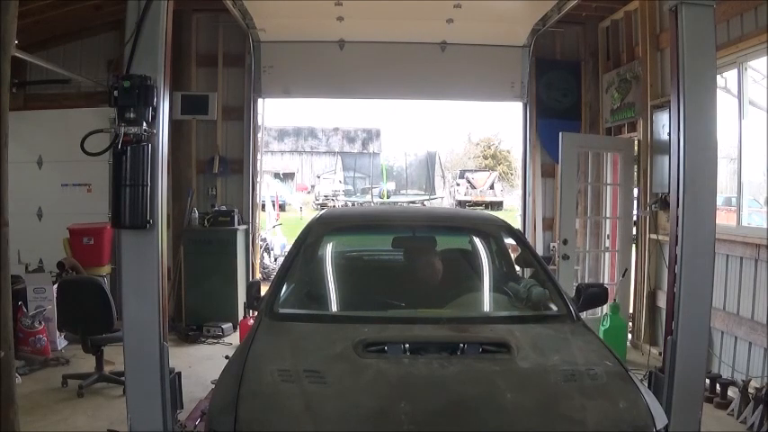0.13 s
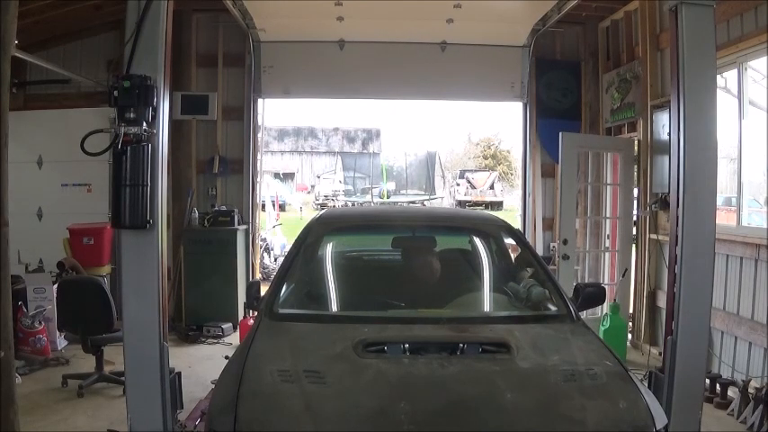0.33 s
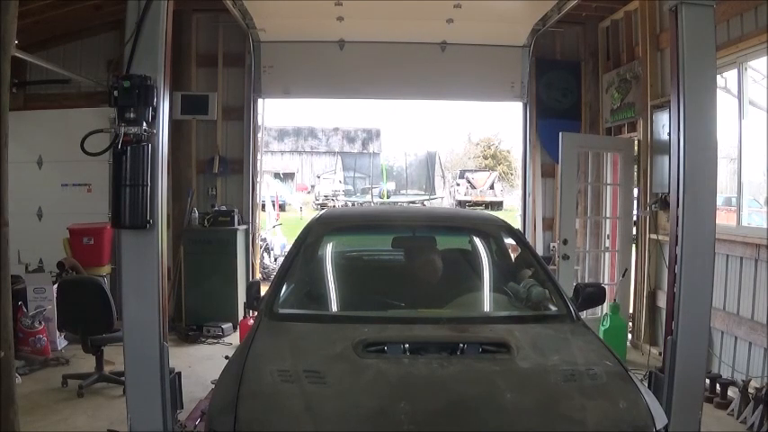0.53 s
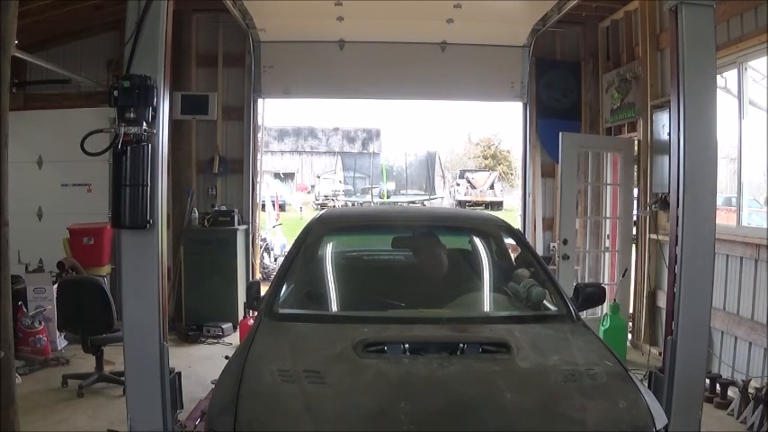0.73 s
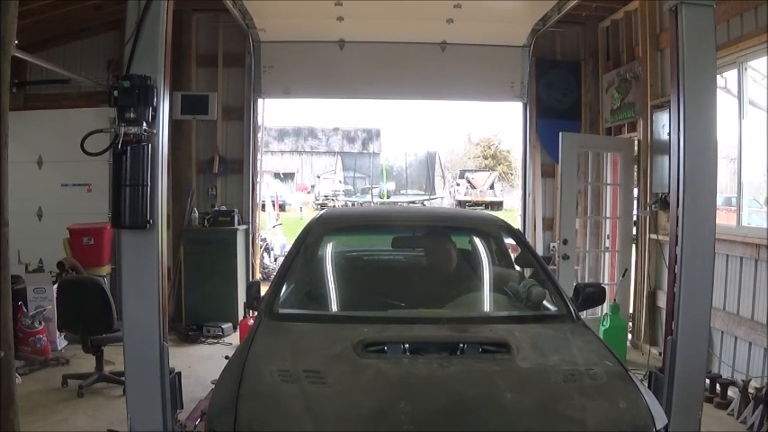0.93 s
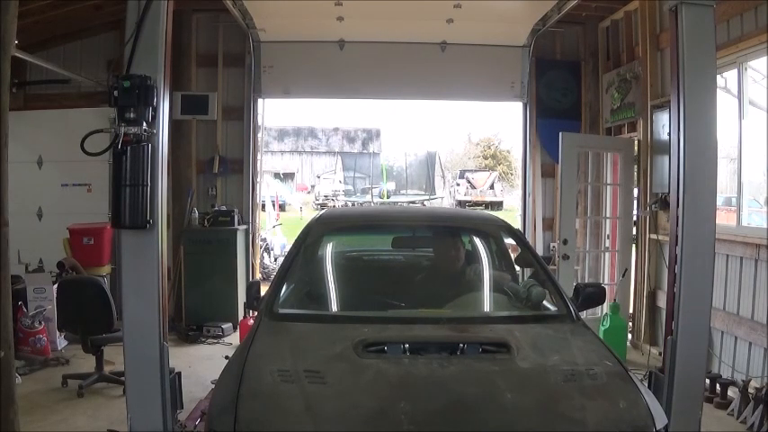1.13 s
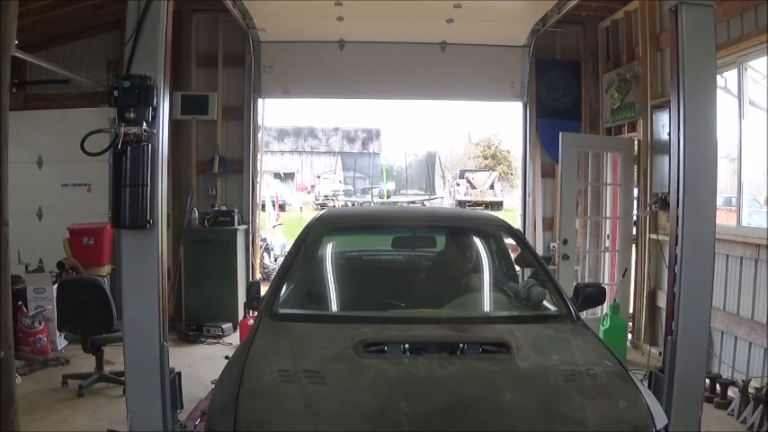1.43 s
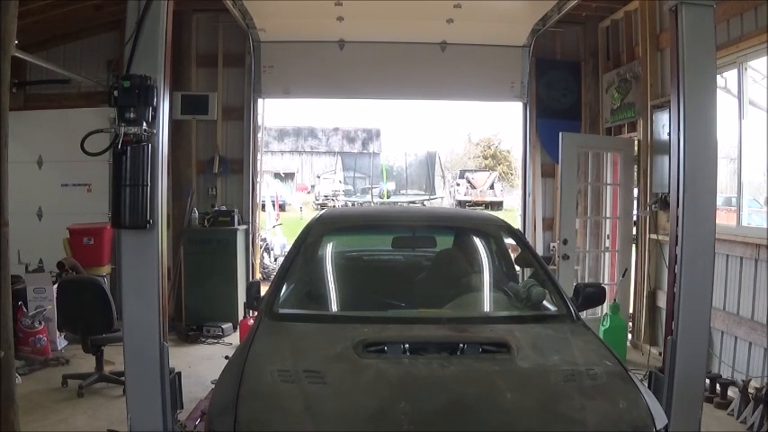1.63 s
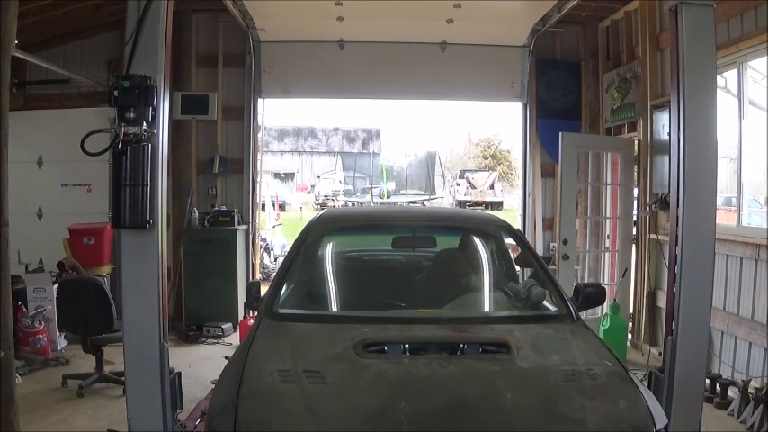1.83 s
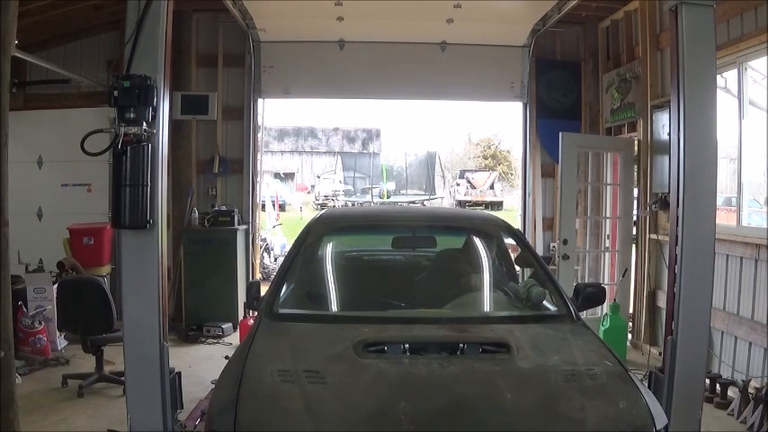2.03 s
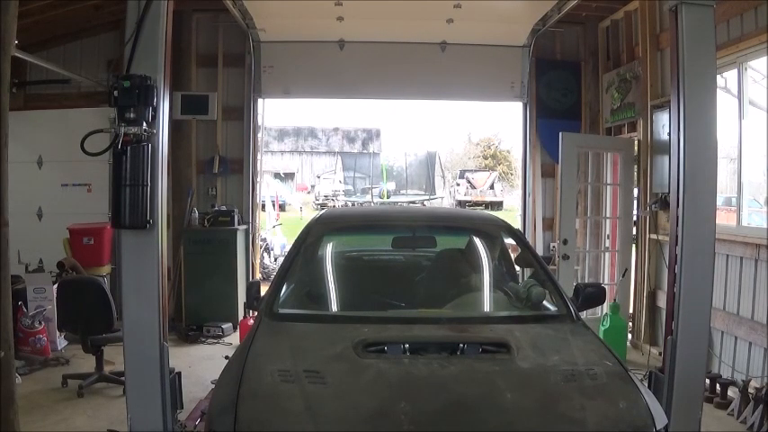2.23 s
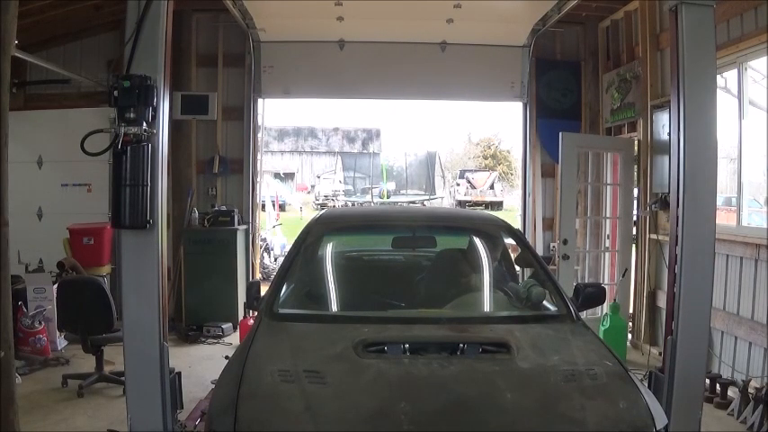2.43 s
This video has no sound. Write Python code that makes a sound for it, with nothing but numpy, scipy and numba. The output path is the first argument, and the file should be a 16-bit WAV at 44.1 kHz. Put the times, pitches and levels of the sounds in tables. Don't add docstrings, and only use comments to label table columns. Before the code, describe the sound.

A car door slams shut with a heavy, rattling thud in a garage, then faint creaks and knocks

```python
import sys
import numpy as np
from scipy import signal
from scipy.fft import rfft, irfft
from scipy.io import wavfile
from scipy.ndimage import uniform_filter1d
from numba import njit

SR = 44100
rng = np.random.default_rng(int(sys.argv[2]) if len(sys.argv) > 2 else 0)


def attenuation_scalar(level_db):
    decades = np.asarray(level_db, float) / 20
    return 10 ** decades


def log_audio(samples):
    frames = np.atleast_2d(samples).T
    limited = np.clip(frames, -1, 1)
    pcm = np.round(limited * 32767).astype(np.int16)
    wavfile.write(sys.argv[1], SR, pcm)


N = 114660
T = np.arange(N) / SR


def unit(x):
    return x / np.sqrt(np.mean(x ** 2))


def conv(a, b):
    return signal.fftconvolve(a, b)[:N]


def curve(table, hz):
    table = np.array(table, float)
    return np.interp(np.log(np.maximum(hz, 1)), np.log(table[:, 0]), table[:, 1])


def noise():
    return rng.standard_normal(N)


def colour(x, table):
    gain = attenuation_scalar(curve(table, np.fft.rfftfreq(N, 1 / SR)))
    return unit(irfft(rfft(x) * gain, N))


def band(x, hz, width):
    return signal.lfilter(*signal.iirpeak(hz, hz / min(width, .4 * SR), SR), x)


def noise_band(hz, width):
    return band(band(noise(), hz, width), hz, width)


def high(x, hz):
    return signal.sosfilt(signal.butter(2, hz, "high", fs=SR, output="sos"), x)


def fade(start, t60, rise=0.0001):
    age = np.maximum(T - start, 0)
    return (1 - np.exp(-age / rise)) * 10 ** (-3 * age / t60)


def swell(start, hz, db, t60, rise):
    return attenuation_scalar(db) * np.sin(2 * np.pi * hz * (T - start)) * fade(start, t60, rise)


def mode(k, age, hz, db, t60):
    return (-1) ** k * attenuation_scalar(db) * np.sin(2 * np.pi * hz * age) * 10 ** (-3 * age / t60)


def struck(blows, modes):
    out, age = np.zeros(N), T[:SR // 2]
    scatter = np.clip(rng.standard_normal((len(blows), len(modes))), -1, 1)
    for (start, db, contact), row in zip(blows, scatter):
        ring = sum(mode(k, age, hz, g + r, t60) for k, ((hz, g, t60), r) in enumerate(zip(modes, row)))
        push = np.sin(np.pi * np.clip(age[:800] / max(contact, 1e-4), 0, 1))
        first = int(start * SR)
        hit = attenuation_scalar(db) * signal.fftconvolve(ring, push / push.sum())[:N - first]
        out[first:first + len(hit)] += hit
    body_low_hz = 80
    return high(high(out, body_low_hz), body_low_hz)


# frequency in Hz, level in dB per Hz.
ROOM_TONE = [(15, -12), (25, -13), (108, -9), (840, -11.5), (911, -13.5), (1610, -15), (1840, -16),
             (2690, -16), (16000, -27)]
# frequency in Hz, level in dB.
ROOM_TONE_SIDE = [(60, -22), (110, -41), (200, -8.5), (380, -3), (700, -2), (1290, 0.5), (2380, -2.5),
                  (4400, -5), (8120, -3.5), (15000, -1)]
# frequency in Hz, level in dB.
HUM = [
    (123.8, -69.5),
    (7870, -75.5),
]
ROOM_TONE_DB = -56.5


def floor():
    mid = colour(noise(), ROOM_TONE)
    side_gain = attenuation_scalar(curve(ROOM_TONE_SIDE, np.fft.rfftfreq(N, 1 / SR)))
    side = irfft(rfft(colour(noise(), ROOM_TONE)) * side_gain, N)
    hum = sum(attenuation_scalar(db) * unit(band(noise(), hz, hz / 150)) for hz, db in HUM)
    return attenuation_scalar(ROOM_TONE_DB) * (mid + side * np.array([[1], [-1]])) + hum


# frequency in Hz, t60 in seconds, side against mid in dB.
GARAGE = [(40.3, 0.23, 2.5), (119, 0.49, -21), (246, 0.5, -11), (513, 0.58, -9), (1000, 0.46, -3.5),
          (2140, 0.5, -8.5), (6000, 0.34, -3.5), (11800, 0.4, -4)]
WET_DB, BUILD_S, WET_LOW_HZ = -0.5, 0.0047, 203


def garage(x):
    table = np.array(GARAGE)
    hz, age, echoes = signal.stft(rng.standard_normal((2, SR)), SR, nperseg=512)
    echoes = echoes * 10 ** (-3 * age / curve(table[:, :2], hz)[:, None])
    echoes[1] *= attenuation_scalar(curve(table[:, ::2], hz))[:, None]
    build = 1 - np.exp(-T[:SR] / BUILD_S)
    mid, side = signal.istft(echoes, SR, nperseg=512)[1][:, :SR] * build
    norm = attenuation_scalar(WET_DB) / np.sqrt(np.sum(mid ** 2))
    sent = 0.055 * x + high(x, WET_LOW_HZ)
    return np.array([conv(sent, (mid + side) * norm), conv(sent, (mid - side) * norm)])


# time in seconds, level in dB.
SWAY = [
    (0, -65),
    (.6, -40),
    (.9, -50),
    (1.3, -54.5),
    (1.7, -56.5),
    (2.0, -65),
    (2.35, -61),
    (2.6, -60),
]
SWAY_HZ, SWAY_WIDTH_HZ = 65, 153


def sway():
    return unit(noise_band(SWAY_HZ, SWAY_WIDTH_HZ)) * attenuation_scalar(np.interp(T, *np.array(SWAY).T))


# start in seconds, frequency in Hz, level in dB, t60 in seconds, rise in seconds.
BOOMS = [
    (.255, 37.8, -8, 0.46, 0.041),
    (0.37, 38, -29, 0.83, 0.043),
    (0.2, 87, -11, 0.87, 0.048),
    (0.27, 300, -17.5, 0.28, 0.037),
    (2.33, 44, -36, 0.53, 0.018),
]


def boom():
    return sum(swell(*row) for row in BOOMS)


# start in seconds, level in dB, contact time in seconds.
KNOCKS = [(.06, -47, 0.003), (.095, -36, 0.0048), (.118, -37, 0.0021), (.15, -42, 0.011),
          (.19, -27, 0.0071), (.868, -53, 0.0054), (1.27, -45.5, 0.0013), (1.655, -36, 0.0039),
          (1.678, -38, 0.0044), (2.2925, -28, 0.0019), (2.3035, -26, 0.0016), (2.316, -38, 0.0025),
          (2.336, -24.5, 0.0021), (2.357, -44, 0.0013), (2.41, -31, 0.0024), (2.422, -45, 0.0042),
          (2.435, -41, 0.0041)]
# frequency in Hz, level in dB, t60 in seconds.
TRIM = [(104, -10, 0.1), (153.6, 1.5, 0.036), (200, 0.5, 0.061), (233, 6, 0.027), (300, -4, 0.065),
        (367, -2, 0.022), (594, -16.5, 0.043), (1023, -9, 0.038)]


def knocks():
    return struck(KNOCKS, TRIM)


# start in seconds, level in dB, centre in Hz, width in Hz, t60 in seconds.
CLICKS = [(0.013, -48, 4080, 200, 0.033), (0.047, -36.5, 2807, 200, 0.018),
          (0.1359, -31, 8500, 6900, 0.018), (0.995, -36.5, 730, 200, 0.028),
          (0.993, -44.5, 3030, 6000, 0.3), (0.994, -42.5, 1260, 1230, 0.11), (1.026, -33, 763, 200, 0.047),
          (1.043, -41.5, 550, 150, 0.045), (1.013, -40, 1170, 500, 0.067), (1.046, -52, 4260, 1500, 0.13),
          (1.012, -50, 4400, 1500, 0.055), (1.101, -50, 3000, 4000, .05), (1.206, -49, 1740, 121, 0.081),
          (1.534, -50.5, 6000, 6000, 0.079), (1.574, -44, 7200, 4200, 0.11), (1.578, -51, 3900, 2030, 0.14),
          (1.677, -31.5, 454, 300, 0.029), (2.127, -50.5, 8480, 4000, 0.039),
          (2.293, -45, 2514, 5040, 0.038), (2.299, -33, 1000, 590, .03), (2.308, -36.5, 1200, 1560, 0.11),
          (2.3068, -46, 6000, 4030, 0.024), (2.316, -44.5, 1680, 1490, 0.054),
          (2.317, -51, 6600, 3000, 0.029), (2.367, -48, 900, 1500, 0.027), (2.342, -46, 880, 1460, 0.14),
          (2.3866, -45.5, 1500, 1780, 0.03), (2.479, -48, 2880, 200, 0.028)]
CLICK_RISE_CYCLES = 2.84


def clicks():
    out = np.zeros(N)
    for start, db, hz, width, t60 in CLICKS:
        out += attenuation_scalar(db) * unit(noise_band(hz, width)) * fade(start, t60, CLICK_RISE_CYCLES / hz)
    return out


# middle in seconds, length in seconds, level in dB, centre in Hz, width in Hz.
SCUFFS = [(0.031, 0.45, -58, 4200, 10000), (0.18, 0.37, -58.5, 840, 1170), (0.651, 0.13, -54, 4200, 7300),
          (1.02, 0.066, -58.5, 10200, 1400), (1.042, 0.094, -51, 1150, 450), (0.77, 0.034, -68, 3450, 2100),
          (0.76, 0.077, -70, 7000, 4400), (1.643, 0.11, -60, 6500, 2300), (1.671, 0.062, -57.5, 1260, 1900),
          (1.5, 0.096, -76, 8600, 230), (1.057, 0.1, -48.5, 375, 350), (1.587, 0.15, -57.5, 820, 6800),
          (2.324, 0.15, -51, 500, 480), (0.13, 0.36, -50, 162, 155)]
SCUFF_GRAIN_DB = 5.5


def scuffs():
    out = np.zeros(N)
    for middle, length, db, hz, width in SCUFFS:
        grain = attenuation_scalar(SCUFF_GRAIN_DB * unit(uniform_filter1d(noise(), size=90)))
        rub = unit(noise_band(hz, width) * grain)
        out += attenuation_scalar(db) * rub * np.exp(-((T - middle) / (length / 2)) ** 2)
    return out


# frequency in Hz, level in dB per Hz.
METAL = [(180, -23), (300, 0), (600, -1.5), (892, -2.5), (1250, -7), (1900, -8), (4200, -15.5),
         (7500, -18.5), (12000, -31.5), (15500, -52.5)]
RATTLE_DB, RATTLE_T60_S, RATTLE_PER_S, RATTLE_SPREAD_DB, RATTLE_DARK_HZ = -1.5, 0.49, 3100, 3.5, 3110


def rattle():
    grains = (rng.random(N) < RATTLE_PER_S / SR) * attenuation_scalar(RATTLE_SPREAD_DB * rng.exponential(size=N))
    chatter = conv(grains, np.exp(-T[:400] / 0.0022))
    chatter = unit(chatter * colour(noise(), METAL))
    chatter = signal.lfilter(*signal.butter(2, RATTLE_DARK_HZ, fs=SR), chatter)
    return attenuation_scalar(RATTLE_DB) * chatter * fade(CRACKS[1][0], RATTLE_T60_S, 0.06)


# start in seconds, level in dB.
CRACKS = [(0.2365, -20.5), (0.2435, -16), (0.252, -9.5), (0.2583, -2), (0.264, -6), (0.277, -9.5),
          (0.297, -5.5), (0.3177, -3), (0.336, -11.5), (.35, -15), (0.362, -15.5), (0.377, -17)]
CRACK_T60_S, CRACK_RISE_S = 0.05, 0.0031


def cracks():
    bursts = sum(attenuation_scalar(db) * fade(start, CRACK_T60_S, CRACK_RISE_S) for start, db in CRACKS)
    return bursts * colour(noise(), METAL)


# start in seconds, frequency in Hz, level in dB, t60 in seconds.
DRUMS = [(0.2357, 179.7, 2, .17), (0.242, 117.9, -6, 0.25), (0.267, 200, -4.5, 0.068), (.286, 175, 4, 0.16),
         (0.315, 200, -1.5, .15), (.351, 189.3, 0.5, 0.17), (0.351, 119.4, -2, 0.15), (.424, 189, -9, 0.13),
         (0.466, 121.4, -13.5, 0.26), (.47, 214, -12.5, .15), (.535, 170.5, -17.5, 0.21)]
DRUM_RISE_S = .009


def drum():
    return sum(swell(*row, DRUM_RISE_S) for row in DRUMS)


# frequency in Hz, level in dB, t60 in seconds.
DOOR = [(108.4, -9, .25), (94.8, -16, 0.26), (137.4, -13.5, 0.21), (147, 0.5, 0.13), (179, -12.5, 0.092),
        (219.5, -9, .12), (253, -5.5, 0.11), (300, -3.5, 0.099), (340.7, -6.5, 0.074), (395.5, -6, 0.068),
        (468, -10.5, 0.079), (550, -10.5, 0.0416), (665, -11.5, 0.052), (774, -11.5, 0.033)]
SHUDDER_DB, SHUDDER_T60_S, SHUDDER_RISE_S, SHUDDER_PER_S, SHUDDER_RING = 4, 0.46, 0.015, 230, 0.34


def shudder():
    slaps = (rng.random(N) < SHUDDER_PER_S / SR) * noise()
    age = T[:SR // 4]
    ring = sum(mode(k, age, hz, db, min(t60, .12) * SHUDDER_RING)
               for k, (hz, db, t60) in enumerate(DOOR[5:]))
    return attenuation_scalar(SHUDDER_DB) * unit(conv(slaps, ring)) * fade(BLOWS[2][0], SHUDDER_T60_S, SHUDDER_RISE_S)


# start in seconds, level in dB, contact time in seconds.
BLOWS = [
    (.2305, -13.5, 0.00057),
    (.2355, -10.5, 0.0016),
    (.2412, 2.5, 0.003),
    (.259, -7.5, 0.0012),
    (.2905, -3.5, 0.0012),
    (.3305, -1, 0.0014),
    (.3605, 0.5, 0.0016),
    (.4055, -8, 0.0021),
    (.476, -14.5, 0.0015),
    (.54, -14.5, 0.0033),
]
DOOR_DB = -8.5


def shell():
    return attenuation_scalar(DOOR_DB) * (struck(BLOWS, DOOR) + shudder())


PAN_DB, BODY_SIDE_DB, BODY_LAG_S = -7, -14.5, 0.0024
METAL_DB, METAL_WET_DB, SEAT_WET_DB = 0.5, -3.5, -2


def scene():
    seat = knocks() + clicks() + scuffs()
    thump = shell()
    metal = attenuation_scalar(METAL_DB) * (cracks() + rattle())
    skin = thump + drum()
    door = skin + metal
    pan = attenuation_scalar(np.array([[PAN_DB], [-PAN_DB]]) / 2)
    wall = attenuation_scalar(BODY_SIDE_DB) * np.interp(T - BODY_LAG_S, T, skin) * np.array([[1], [-1]])
    direct = door + high(door, 320) * (pan - 1) + wall + seat * pan ** 0.14
    wet = garage(thump + attenuation_scalar(SEAT_WET_DB) * seat) + garage(attenuation_scalar(METAL_WET_DB) * metal)
    lows = (boom() + sway()) * attenuation_scalar(np.array([[1.1], [-1.1]]))
    return direct + wet + lows + floor()


@njit
def limiter(peak, top, attack, release, slope):
    gain, envelope = np.ones(len(peak)), 0.
    for i in range(len(peak)):
        envelope += (peak[i] - envelope) * (attack if peak[i] > envelope else release)
        if envelope > top:
            gain[i] = (top / envelope) ** slope
    return gain


def low_pass(x):
    return signal.sosfilt(signal.butter(12, 15550, fs=SR, output="sos"), x)


CEILING, RATIO, ATTACK_S, RELEASE_S = .72, 6, .0015, .045
TOP_HZ, SIDE_TOP_HZ = 15750, 9000


def record(dry):
    peak = np.abs(dry).max(axis=0)
    gain = limiter(peak, 1. * CEILING, 1 / (ATTACK_S * SR), 1 / (RELEASE_S * SR), 1 - 1 / RATIO)
    left, right = np.tanh(dry * gain)
    mid = signal.sosfiltfilt(signal.ellip(6, .1, 40, TOP_HZ, fs=SR, output="sos"), left + right) / 2
    side = signal.sosfiltfilt(signal.butter(1, SIDE_TOP_HZ, fs=SR, output="sos"), left - right) / 2
    return low_pass(np.array([mid + side, mid - side]))


dry = scene()
out = record(dry)
log_audio(out)
```